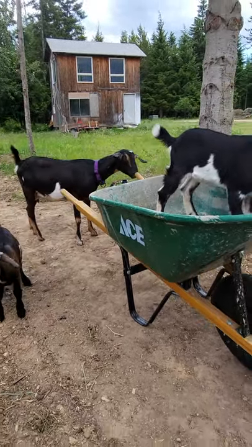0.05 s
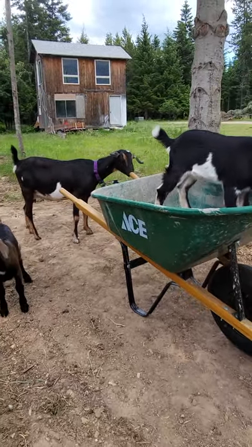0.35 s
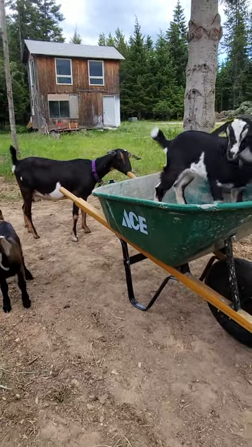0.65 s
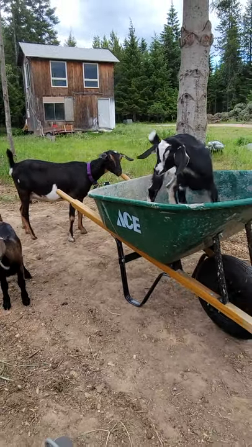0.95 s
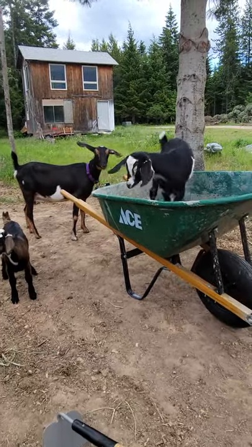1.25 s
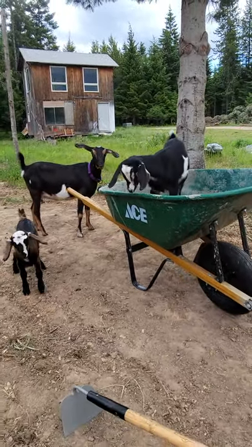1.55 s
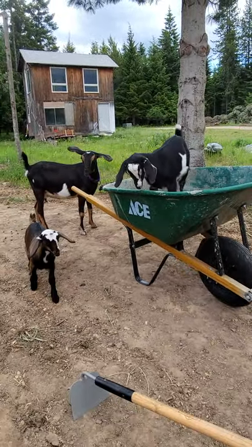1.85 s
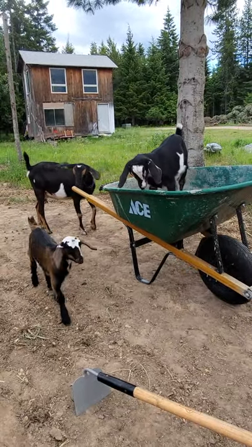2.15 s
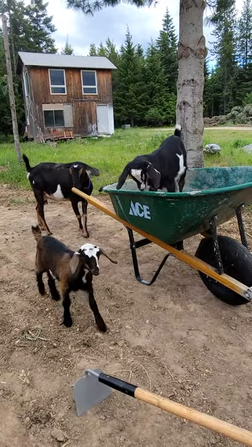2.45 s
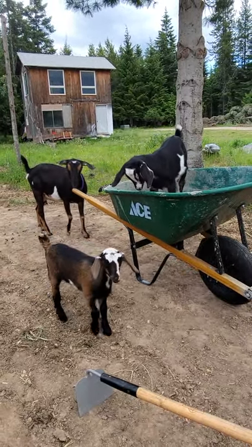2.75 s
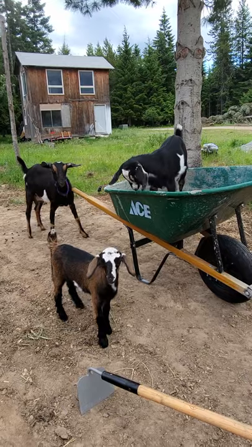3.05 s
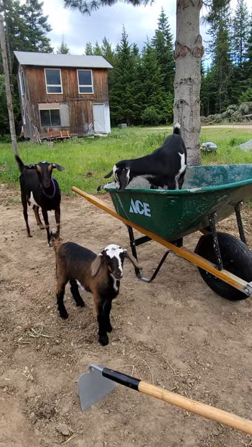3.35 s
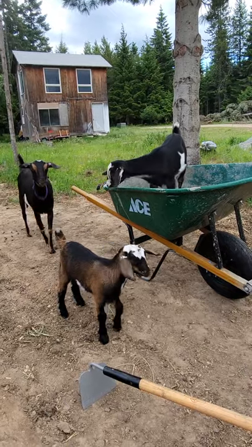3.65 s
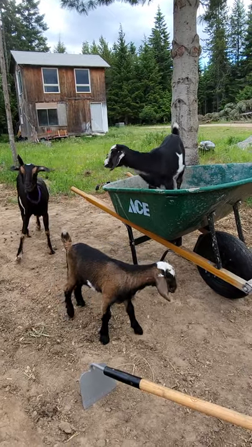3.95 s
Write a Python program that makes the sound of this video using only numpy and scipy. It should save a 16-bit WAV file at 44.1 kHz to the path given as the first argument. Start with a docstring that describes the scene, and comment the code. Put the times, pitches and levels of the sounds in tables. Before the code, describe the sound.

A goat's hooves bang on a metal wheelbarrow tray, with ringing stamps at about 0.8 and 1.2 seconds and light scuffs. Dry ticks snap close to the microphone, mostly between 0.6 and 1.8 seconds. A hoof clacks at 2.1 seconds, then soft treads boom near 2.5 and 3.3. Low wind thumps the microphone from 1.8 to 2.7 seconds, returning near the end. A distant bird trills faintly throughout.

```python
"""Hooves bang on sheet metal as a young goat turns round in a wheelbarrow: ringing stamps on the
tray floor, light scuffs, clacks on the stiffer side wall, then soft treads that only boom the tray.
Dry ticks snap close to the microphone, and from about halfway a gust of wind thumps on its ports.
Behind lies a quiet farmyard with a faint, high bird trill."""
import sys
import numpy as np
from scipy import signal
from scipy.fft import rfft, irfft, next_fast_len
from scipy.io import wavfile
from scipy.ndimage import uniform_filter1d

SR = 44100
rng = np.random.default_rng(int(sys.argv[2]) if len(sys.argv) > 2 else 0)


def to_wav(s):
    """Save 16-bit WAV."""
    ch = np.atleast_2d(s).T  # columns
    pcm = np.round(np.clip(ch, -1, 1) * 32767)  # PCM
    wavfile.write(sys.argv[1], SR, pcm.astype(np.int16))


N = 176400
T = np.arange(int(.7 * SR)) / SR  # seconds within one blow or scuff

# The stereo width of the metal. Each row: frequency in Hz, left-right correlation.
TRAY_ALIKE = [(150, .5), (600, 0.25), (1400, -0.31), (3000, .1)]


def amp(db):
    """Decibels to gain."""
    return 10 ** (np.asarray(db) / 20)


def unit(x):
    """Scale to rms 1."""
    return x / np.sqrt(np.mean(x ** 2) + 1e-20)


def along(points, hz):
    """Read a curve of (Hz, value) points on a log frequency axis."""
    freqs, values = np.transpose(points)
    return np.interp(np.log(hz + 1), np.log(freqs + 1), values)


def pan(db):
    """Left and right gains for a left-minus-right level difference."""
    return amp(np.array([[db], [-db]]) / 2)


def tilt(hz, slope_db):
    """Brighten or darken by a slope in dB per octave about the midrange."""
    return amp(slope_db * np.log2(np.clip(hz, 200, 6000) / 1500))


def filtered(x, response):
    """Equalise x with a gain that is a function of frequency."""
    n = x.shape[-1]
    padded = next_fast_len(n + 8192)
    return irfft(rfft(x, padded) * response(np.fft.rfftfreq(padded, 1 / SR)), padded)[..., :n]


def noise(colour, alike, size):
    """Coloured stereo noise of rms 1; alike sets the left-right correlation by frequency."""
    def mid_side_gains(hz):
        width = np.arccos(np.clip(along(alike, hz), -1, 1)) / 2
        return amp(along(colour, hz)) * [np.cos(width), np.sin(width)]
    mid, side = filtered(rng.standard_normal((2, size)), mid_side_gains)
    return unit(np.array([mid + side, mid - side]))


def fade(t, t60):
    """Exponential decay, 60 dB down after t60 seconds."""
    return np.exp(-np.log(1000) * t / t60)


def add(out, start, x):
    """Mix x into out at a start time in seconds."""
    i = max(round(start * SR), 0)
    part = out[:, i:i + x.shape[-1]]
    part += x[..., :part.shape[-1]]


def yard():
    """The steady, quiet air of the farmyard."""
    colour = [(25, -12), (50, -4.5), (85, 8.5), (150, -3.5), (300, -8), (750, -6.5), (1300, -10),
              (2200, -15.5), (4000, -22.5), (5800, -22.5), (7000, -28), (8500, -46), (12000, -45),
              (16000, -42.5)]  # The air's tone. Each row: frequency in Hz, relative level in dB.
    alike = [(100, 0.63), (500, 0.32), (1500, 0.018), (5000, 0)]  # Its width. Each row: frequency in Hz, left-right correlation.
    return amp(-54) * pan(-0.5) * noise(colour, alike, N)


def bird():
    """A far bird trills in quick falling chirps, smeared by the trees."""
    # The bird's phrases. Each row: start in seconds, end in seconds, relative level in dB.
    trills = [(0, .09, -72), (0.187, .27, -74.5), (0.379, .63, -70.5), (0.798, 1.2, -71.5),
              (1.261, 1.7, -74), (1.77, 2.17, -76), (2.262, 2.45, -77), (2.529, 2.68, -75),
              (2.75, 3.21, -78.5), (3.318, 3.56, -78.5), (3.741, 4, -76.5)]
    spacing_s, chirp_s, top_hz, end_hz = .031, .028, 6400, 5090
    out, t = np.zeros((2, N)), np.arange(int(chirp_s * SR)) / SR
    cycles = np.cumsum(top_hz + (end_hz - top_hz) * t / chirp_s) / SR
    swell = np.sin(np.pi * t / chirp_s) ** 2
    for start, end, db in trills:
        jitter = rng.standard_normal((32, 3))
        for onset, (late, pitch, loud) in zip(np.arange(start, end, spacing_s), jitter):
            chirp = swell * np.sin(2 * np.pi * cycles * (1 + .02 * pitch))
            add(out, onset + .003 * late, 2 * amp(db + 2 * loud) * chirp)
    trees = rng.standard_normal((2, len(T))) * fade(T, t60=.15)
    smear = signal.fftconvolve(out, trees / np.linalg.norm(trees[0]), axes=1)[:, :N]
    return (out + amp(1) * smear) * pan(-5)


def ticks():
    """Single damped snaps that reach the right port first, each with a faint scatter behind it."""
    # The close ticks. Each row: time in seconds, level in dB, left minus right in dB,
    # brightness in dB per octave.
    snaps = [(.2483, -33, 6, 1), (0.6307, -28, -6, 6), (0.6496, -19.5, -7, 3), (.6707, -20, -7, 2.5),
             (0.7247, -17, -4.5, 4.5), (0.8072, -15.5, -4, 3), (0.8936, -18, 0, 3),
             (0.9367, -22, -4.5, 2.5), (1.0014, -24.5, 1.5, 1), (1.0456, -22, -2.5, 0),
             (1.1459, -22, 0, -0.5), (1.1591, -22.5, -4, 0.5), (1.2161, -17.5, -5, 1.5),
             (1.314, -22, -4, 4), (1.4995, -25, 4.5, 7.5), (1.5077, -33.5, -0.5, 9), (1.6928, -23, 8, -1),
             (1.8152, -28.5, 2, 2.5)]
    colour = [(80, -12), (200, -4.5), (420, 3.5), (750, -3.5), (1300, 5), (1800, 1.5), (2500, 4),
              (3600, -3), (4300, -11), (5200, -18.5), (7000, -32), (9000, -43), (16000, -37)]  # Their tone. Each row: frequency in Hz, relative level in dB.
    left_lag_s, scatter_db, size = .00029, -9.5, 4096
    out = np.zeros((2, N))
    hz, t = np.fft.rfftfreq(size, 1 / SR), np.arange(size) / SR
    for start, db, pan_db, slope_db in snaps:
        gain = amp(along(colour, hz)) * tilt(hz, slope_db)
        # Minimum phase packs the energy into the front of the snap.
        cepstrum = irfft(np.log(gain)) * (1 + np.sign(t)) * (np.arange(size) < size // 2)
        snap = irfft(np.exp(rfft(cepstrum) - 2j * np.pi * hz * np.array([[left_lag_s], [0]])))
        scatter = irfft(gain * rfft(rng.standard_normal((2, size)))) * fade(t, t60=0.039)
        scatter *= amp(scatter_db) * np.linalg.norm(snap) / np.linalg.norm(scatter)
        add(out, start - left_lag_s, amp(db) * pan(pan_db) * (scatter - snap) / np.abs(snap).max())
    return out


def scuffs():
    """A hoof slides a little: a short, gritty swell."""
    # The slides. Each row: crest in seconds, level in dB, half-width in seconds.
    slides = [(.275, -56.5, 0.014), (0.359, -57, 0.04), (0.829, -54.5, 0.016), (0.949, -52.5, 0.031),
              (1.031, -54.5, .06), (1.158, -52, .025), (1.51, -56, .012), (1.72, -65, .008),
              (2.285, -63, .03), (2.416, -54, .008), (2.438, -75, 0.024)]
    colour = [(300, -32), (1500, 0), (2800, 0.5), (4000, -5), (6500, -10), (9000, -31), (16000, -33.5)]  # Their tone. Each row: frequency in Hz, relative level in dB.
    out = np.zeros((2, N))
    for crest, db, width in slides:
        roughness = unit(uniform_filter1d(rng.standard_normal(len(T)), size=60))
        grit = unit(np.exp(.5 * roughness))
        swell = np.exp(-(T / width - 2) ** 2)
        add(out, crest - 2 * width, amp(db) * grit * swell * noise(colour, TRAY_ALIKE, len(T)))
    return out * pan(-5)


def blow(modes, colour, decays, modes_db, wash_db, crack_db):
    """One blow on sheet metal: clear modes, a dense wash that dies by band, and a short crack."""
    phases = rng.uniform(0, 2 * np.pi, (len(modes), 1, 1))
    phases = phases + rng.normal(0, 0.85, (len(modes), 2, 1))  # left and right drift apart
    gains = amp(np.array(modes)[:, 1] + rng.normal(0, 1.5, len(modes)))
    ring = sum(gain * np.sin(2 * np.pi * hz * T + phase) * fade(T, t60)
               for (hz, _, t60), gain, phase in zip(modes, gains, phases))
    ring /= np.sqrt(np.sum(gains ** 2) / 2)
    hz, t, bands = signal.stft(noise(colour, TRAY_ALIKE, len(T)), SR, nperseg=256)
    bands *= fade(t, along(decays, hz)[:, None])
    wash = signal.istft(bands, SR, nperseg=256)[1][:, :len(T)]
    crack = noise(colour, TRAY_ALIKE, len(T)) * fade(T, t60=0.067)
    return amp(modes_db) * ring + amp(wash_db) * wash + amp(crack_db) * crack


def hard_hoof(metal, slope_db, rise_s):
    """Give a blow the brightness and attack of one hard hoof contact."""
    return filtered(metal, lambda hz: tilt(hz, slope_db)) * (1 - np.exp(-(T / rise_s) ** 2))


def stamps():
    """Hooves bang on the tray floor and set it ringing."""
    # The stamps. Each row: start in seconds, level in dB, brightness in dB per octave, rise in seconds.
    hits = [(.8435, -27, 1, .003), (1.226, -30, 0, 0.0051), (1.5, -47, -2.5, 0.0024),
            (.345, -60.5, -4, 0.0043)]
    # The floor's modes. Each row: frequency in Hz, relative level in dB, t60 in seconds.
    modes = [(221, -13, .3), (304, -4, 0.21), (365, -2.5, 0.51), (519, -3, 0.53), (565, -10.5, 0.25),
             (658, -1, 0.63), (761, -1, 0.4), (795, -6.5, 0.55), (848, -21, .35), (1096, 1.5, 0.25),
             (1146, 0.5, .25), (1275, -15, 0.25), (1424, -2, 0.23), (1670, -13, 0.23), (1895, -3, 0.25)]
    # Its dense higher-order ringing. Each row: frequency in Hz, relative level in dB.
    colour = [(60, -11.5), (130, -2), (350, 0), (800, 0), (1500, -2), (2200, -6.5), (3200, -13.5),
              (4500, -23), (7000, -37.5), (9000, -46.5), (16000, -61)]
    decays = [(150, 0.47), (600, 0.51), (1500, 0.32), (3000, 0.26), (8000, .22)]  # How that dies. Each row: frequency in Hz, t60 in seconds.
    out = np.zeros((2, N))
    for start, db, slope_db, rise_s in hits:
        floor = blow(modes, colour, decays, modes_db=-5.5, wash_db=-2, crack_db=3.5)
        add(out, start, amp(db) * hard_hoof(floor, slope_db, rise_s))
    return out


def clacks():
    """Hooves knock the stiffer side wall, which rings higher and shorter."""
    # The clacks. Each row: start in seconds, level in dB, brightness in dB per octave, rise in seconds.
    hits = [(2.0575, -29.5, 1, 0.0017), (2.079, -42, 1.5, .002), (1.506, -43, 3.5, .002)]
    # The wall's modes. Each row: frequency in Hz, relative level in dB, t60 in seconds.
    modes = [(650, -16, 0.57), (701, -10.5, 0.24), (790, -12, 0.19), (1114, -2, .1), (1135, 0.5, 0.1),
             (1887, -19, .1), (2083, -12.5, .11), (2153, -14, 0.17), (2670, -14.5, .12), (2912, -24, .13),
             (3252, -23, .12)]
    colour = [(100, -22.5), (400, -5), (1100, -1.5), (1500, -10), (2000, -5.5), (3200, -15), (4500, -26),
              (7000, -36.5), (9000, -61), (16000, -52.5)]  # Its wash. Each row: frequency in Hz, relative level in dB.
    decays = [(300, 0.48), (1000, 0.35), (3000, 0.13), (8000, 0.14)]  # How that dies. Each row: frequency in Hz, t60 in seconds.
    out = np.zeros((2, N))
    for start, db, slope_db, rise_s in hits:
        wall = blow(modes, colour, decays, modes_db=-2, wash_db=-8.5, crack_db=-6)
        add(out, start, amp(db) * hard_hoof(wall, slope_db, rise_s))
    return out


def wind():
    """Low buffeting, strongest on the left port, with a few single thumps at the height of the gust."""
    gust = [(0, -71.5), (1.4, -61.5), (1.76, -47), (1.83, -36), (1.93, -36), (2.1, -44), (2.16, -29.5),
            (2.26, -36.5), (2.37, -30.5), (2.53, -38), (2.66, -30), (2.79, -54), (3.23, -54.5), (3.42, -48),
            (3.58, -53), (3.71, -35.5), (3.86, -46.5), (4, -37)]  # The gust's swell. Each row: time in seconds, level in dB.
    colour = [(15, -15), (35, -3.5), (60, 1), (85, -1.5), (120, -8.5), (180, -17.5), (280, -33),
              (600, -51.5), (2000, -98)]  # Its tone. Each row: frequency in Hz, relative level in dB.
    # Its thumps. Each row: crest in seconds, level in dB, pitch in Hz, half length in seconds.
    thumps = [(2.151, -17.5, 79, 0.011), (2.319, -26.5, 85, 0.014), (2.487, -25, 62.4, 0.01),
              (2.577, -26, 75, .01), (2.654, -24.5, 59.3, 0.013)]
    trim_db, flutter_db = 0.5, 1
    t = np.arange(N) / SR
    flutter = unit(uniform_filter1d(rng.standard_normal(N), size=2000))
    level_db = np.interp(t, *np.transpose(gust)) + trim_db + flutter_db * flutter
    out = amp(level_db) * noise(colour, alike=[(30, .35), (200, 0.2)], size=N)
    for crest, db, hz, half_length in thumps:
        swell = np.exp(1 - np.hypot(1, (t - crest) / (half_length / 2)))
        out += amp(db) * swell * np.cos(2 * np.pi * hz * (t - crest))
    return out * pan(7)


def treads():
    """Soft steps that only boom the tray's low modes."""
    steps = [(3.257, -33.5), (2.45, -40.5), (3.775, -51)]  # The treads. Each row: start in seconds, level in dB.
    # The low modes. Each row: frequency in Hz, relative level in dB, t60 in seconds.
    modes = [(110.8, 4.5, 0.23), (137, 0, .2), (222.3, -5.5, .3), (303, -23, .3), (368, -11.5, 0.33)]
    colour = [(60, -11), (150, 7.5), (380, -1), (600, -21), (1400, -16), (3000, -25), (6000, -28),
              (12000, -73)]  # Their wash. Each row: frequency in Hz, relative level in dB.
    decays = [(150, 0.51), (1000, .35), (5000, .2)]  # How that dies. Each row: frequency in Hz, t60 in seconds.
    out = np.zeros((2, N))
    attack = 1 - np.exp(-T / 0.0043)
    for start, db in steps:
        boom = blow(modes, colour, decays, modes_db=1.5, wash_db=-7.5, crack_db=-8)
        add(out, start, amp(db) * boom * attack)
    return out


def hooves():
    """All the blows on the wheelbarrow, with the lows leaning left and the highs right."""
    # The metal's stereo balance. Each row: frequency in Hz, left minus right in dB.
    balance = [(100, 3), (280, 3.5), (500, -3), (1500, -3.5), (6000, -4)]
    blows = stamps() + clacks() + treads()
    return filtered(blows, lambda hz: amp(along(balance, hz) * np.array([[.5], [-.5]])))


def scene():
    """Goat, ticks, wind and bird over the steady air of the yard."""
    return yard() + hooves() + scuffs() + ticks() + wind() + bird()


def record(dry):
    """The recorder keeps nothing above 16 kHz."""
    return filtered(dry, lambda hz: hz < 16000)


dry = scene()
out = record(dry)
to_wav(out)
```